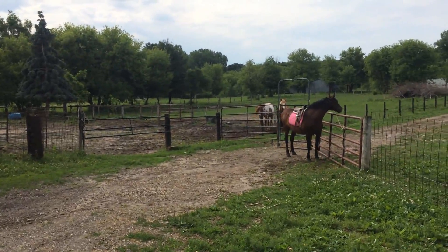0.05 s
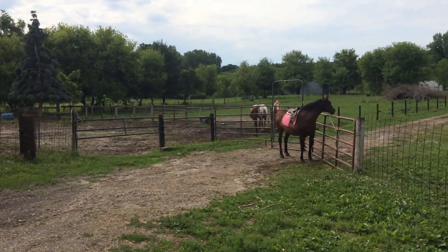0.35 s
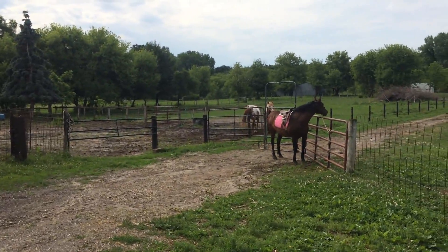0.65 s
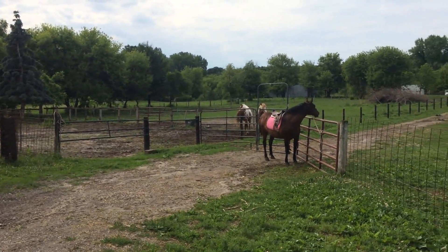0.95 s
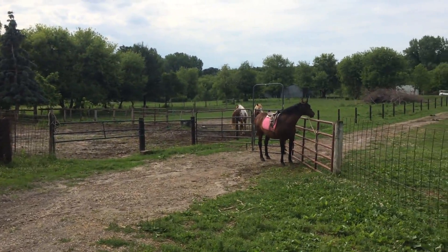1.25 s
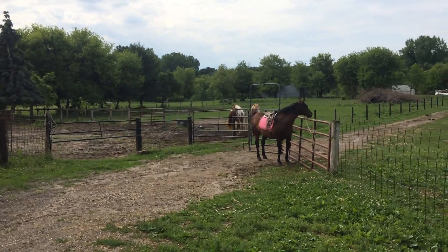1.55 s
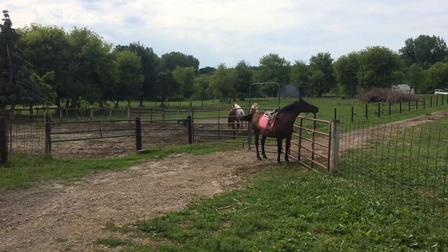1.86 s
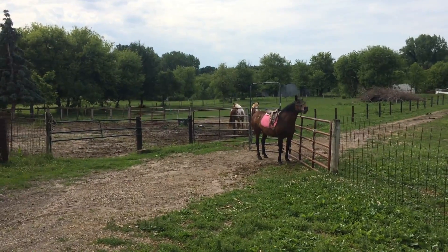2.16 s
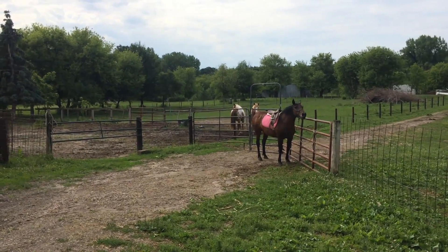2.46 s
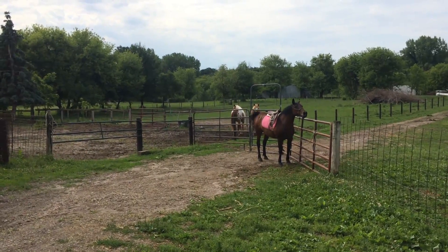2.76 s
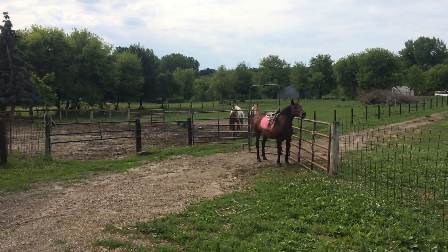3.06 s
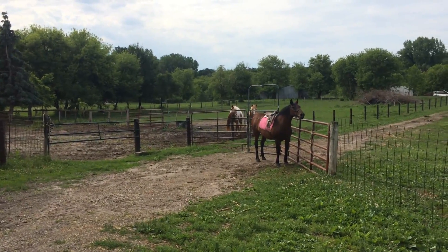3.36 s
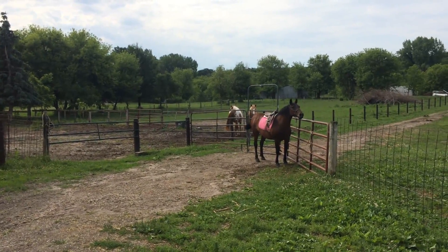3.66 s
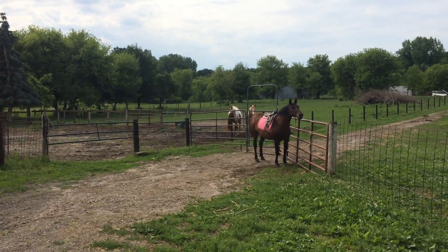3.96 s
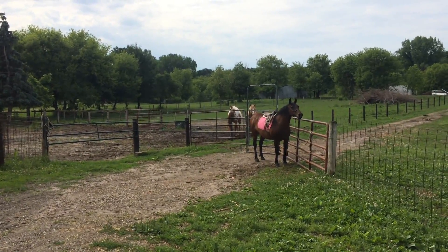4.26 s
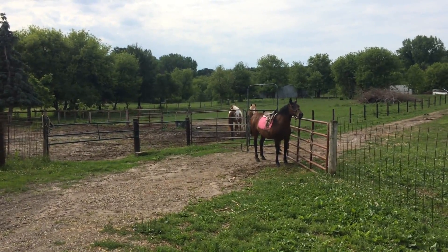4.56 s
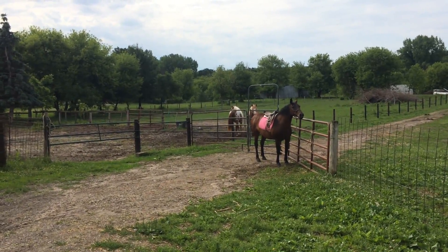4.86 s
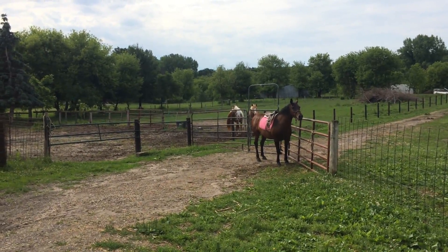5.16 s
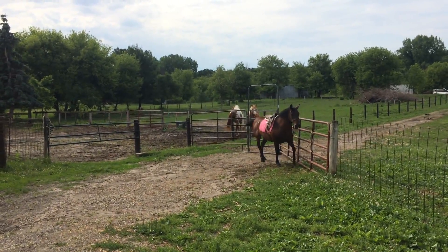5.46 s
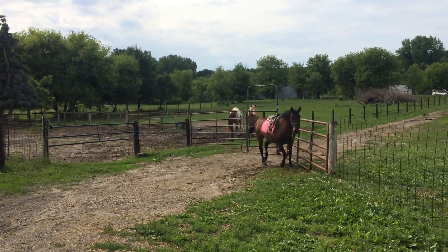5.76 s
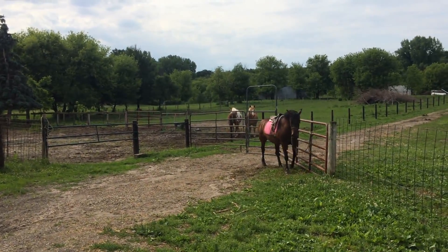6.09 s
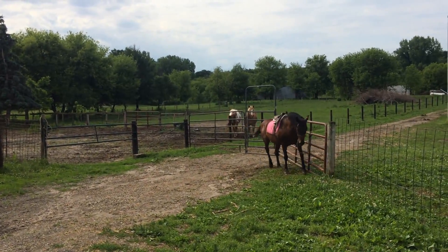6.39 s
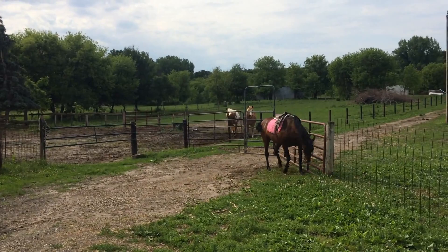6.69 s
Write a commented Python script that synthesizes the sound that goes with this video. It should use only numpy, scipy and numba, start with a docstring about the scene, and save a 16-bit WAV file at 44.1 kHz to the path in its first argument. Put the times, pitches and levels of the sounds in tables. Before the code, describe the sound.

In an open field, a horse lets out one loud whinny, starting as a thin high squeal over a wobbling lower voice, then turning hoarse and pulsing before a short flapping snort. Near the end come a few quiet hoof swishes in grass and one sharp little clink of tack. Faint bird chirps and the low rumble of a far engine continue throughout, and the call echoes slightly off the trees.

```python
"""A distant engine rumbles throughout. Hooves swish in the grass and small birds chirp in the trees.
Near 2 s a horse at a paddock gate whinnies with two voices at once, both from its vocal folds:
a high squeal and a wobbling low voice. They break into rough, falling throbs and end in nostril flaps.
From about 5.7 s the horse steps over the grass, and its tack (the gear it wears) clinks once."""
import sys
import numpy as np
from scipy import signal
from scipy.fft import rfft, irfft
from scipy.io import wavfile
from scipy.ndimage import uniform_filter1d
from numba import njit

SR = 44100
rng = np.random.default_rng(int(sys.argv[2]) if len(sys.argv) > 2 else 0)


def bounce(signal):
    """Save signal as a 16-bit WAV file at the path given by the first command-line argument."""
    frames = np.transpose(np.atleast_2d(signal))
    limited = np.clip(frames, -1, 1)
    pcm = np.round(limited * 32767).astype(np.int16)
    wavfile.write(sys.argv[1], SR, pcm)


N = 301203
T = np.arange(N) / SR
CALL_START_S, CALL_END_S, BREAK_TAKES_S = 1.885, 3.15, .03

# Levels in all tables are relative: the functions turn them up or down.
# where the throat and muzzle ring: f/Hz, width/Hz, level/dB
MOUTH_RINGS = [(538, 133, 1.5), (754.6, 91, 9.5), (1447, 350, 3.5), (1570, 67, -4.5), (2093, 140, 3),
               (2260, 69, 1.5)]
# where the throat's bright edge rings: f/Hz, width/Hz, level/dB
EDGE_RINGS = [(2910, 150, -3), (3278, 297, 1), (3543, 210, -6), (3985, 254, -7.5)]
# where the rushing breath hisses: f/Hz, width/Hz, level/dB
HISS_RINGS = [(4950, 2170, 6), (6220, 1400, 2.5), (7550, 840, 6.5), (10710, 2513, -2.5),
              (13000, 5600, -10.5)]


def amp(db):
    """Turn decibels into a number to multiply by."""
    return 10 ** (np.asarray(db) / 20)


def unit(x):
    """Scale x to an average strength (rms) of 1."""
    return x / np.sqrt(np.mean(x ** 2))


def noise():
    """An even hiss: white noise."""
    return rng.standard_normal(N)


def wander(hz):
    """A smooth random wiggle of size about 1 that changes up to hz times a second."""
    return unit(irfft(rfft(noise()) / (1 + (np.fft.rfftfreq(N, 1 / SR) / hz) ** 4), N))


def curves(table):
    """Join a table's rows by straight lines in time, one curve for each column after the first."""
    s, *columns = np.transpose(table)
    return [np.interp(T, s, c) for c in columns]


def bump(s, half_length):
    """A bell-shaped swell around time s."""
    return np.exp(-np.minimum(((T - s) / half_length) ** 2, 30))


def ramp(start, length):
    """A straight rise from 0 to 1."""
    return np.clip((T - start) / length, 0, 1)


def sounding(start, end):
    """1 between two times and 0 outside, with soft ends."""
    return uniform_filter1d(1. * ((T > start) & (T < end)), size=300)


def turn(hz):
    """How far a wave of changing pitch has turned: its phase in radians."""
    return 2 * np.pi * np.cumsum(hz) / SR


def colour(x, points):
    """Shape the lows and highs of x by rows of f/Hz, level/dB; the result has strength 1."""
    hz, db = np.transpose(points)
    curve_db = np.interp(np.log(np.fft.rfftfreq(N, 1 / SR) + 1), np.log(hz), db)
    return unit(irfft(rfft(x) * amp(curve_db), N))


def resonance(x, hz, width):
    """Keep the part of x near hz, filtering twice for steep sides."""
    b, a = signal.iirpeak(hz, hz / width, fs=SR)
    return signal.lfilter(b, a, signal.lfilter(b, a, x))


def echo(x, fade_s, build_s):
    """A blurred echo from trees and fences that drops 60 dB in fade_s."""
    t = T[:SR]
    tail = rng.standard_normal(SR) * amp(-60 * t / fade_s) * (1 - np.exp(-t / build_s))
    return signal.fftconvolve(x, tail / np.linalg.norm(tail))[:N]


def outdoor_air(level_db=-40):
    """A restless far rumble with a faint hiss of leaves."""
    # lows and highs of the rumble and leaves: f/Hz, level/dB
    air_colour = [(13, -56), (22, -31.5), (49, -6.5), (104, 1.5), (257, -16.5), (420, -18), (668, -27),
                  (1010, -28.5), (1090, -27), (1250, -31.5), (2220, -42), (3250, -44.5), (5030, -48.5),
                  (12700, -59), (15000, -59.5)]
    return colour(noise(), air_colour) * amp(level_db + wander(7.4))


def engine(boom_hz=64, drone_hz=105.7, whine_hz=1090):
    """A far engine: a noisy boom, a wavering drone and a thin whine."""
    # slow swell of the drone: t/s, level/dB
    drone_levels = [(0.0, -53), (0.48, -43.5), (2.68, -56), (3.14, -44.5), (4.22, -45), (4.37, -54),
                    (4.75, -46), (6.83, -42.5)]
    # swells of the whine: t/s, half length/s, level/dB
    whine_swells = [(4.44, 0.16, -53), (5.35, 0.41, -67), (6.202, 0.13, -56.5)]
    boom = amp(-48) * unit(resonance(noise(), boom_hz, width=30))
    drone_db = curves(drone_levels)[0] - 4 + 1.5 * wander(2.6)
    drone = amp(drone_db) * np.sin(turn(drone_hz * (1 + .035 * wander(8.5))))
    swell = amp(-68) + sum(amp(db) * bump(s, half) for s, half, db in whine_swells)
    whine = swell * amp(3.32 * wander(15.3)) * np.sin(turn(whine_hz * (1 + .013 * wander(51.2))))
    return boom + drone + whine


def crackle(hits, fade_s, rise_s=.001, grain_db=3):
    """A burst of bright, grainy noise for each hit (t/s, level/dB), dropping 60 dB in fade_s."""
    # lows and highs of the crackle: f/Hz, level/dB
    crackle_colour = [(1000, -11), (2900, -8), (3700, -8), (5000, 1.5), (7600, 2.5), (10000, -3.5),
                      (15000, -5.5)]
    loudness = 0
    for s, db in hits:
        age = np.maximum(T - s, 0)
        loudness += (1 - np.exp(-age / rise_s)) * amp(db - np.minimum(60 * age / fade_s, 100))
    return loudness * colour(noise() * amp(grain_db * wander(510)), crackle_colour)


def hooves():
    """Hooves brush through the grass in soft swishes."""
    # the swishes: t/s, level/dB
    swishes = [(.005, -58), (.075, -64.5), (5.675, -57), (5.782, -64), (6.0, -65), (6.328, -59.5),
               (6.458, -62.5), (6.63, -58.5)]
    return crackle(swishes, fade_s=.35)


def bird_chatter(flicker_db, spread_hz=2000 / 3):
    """Bursts of twitter in which the pitch darts about at random."""
    # the bursts: peak t/s, half length/s, middle f/Hz, level/dB
    bursts = [(.02, 0.031, 4100, -51), (.092, 0.025, 4450, -50), (.826, .11, 5160, -61.5),
              (1.336, 0.12, 4680, -58), (1.525, .092, 4080, -61), (3.19, 0.052, 3900, -52.5),
              (4.027, .11, 4920, -60.5), (5.771, .05, 4200, -57.5), (6.48, .14, 4850, -62.5)]
    dart, out = np.clip(wander(168.8), -2, 2), np.zeros(N)
    for s, half, hz, db in bursts:
        span = abs(T - s) < 3 * half
        loudness = amp(db - .5 + flicker_db[span]) * bump(s, half)[span]
        out[span] += loudness * np.sqrt(2) * np.sin(turn(hz + spread_hz * dart[span]))
    return out


def bird_notes(faint_count=12, chirp_fall=.22, whistle_hz=2880):
    """List the birds' notes: t/s, length/s, start f/Hz, end f/Hz, arch/Hz, level/dB."""
    # nearer chirps (arch lifts the pitch mid-note): t/s, length/s, f/Hz, arch/Hz, level/dB
    near_chirps = [(0.284, .11, 3540, 0, -57), (0.406, .063, 2400, 0, -60.5),
                   (0.468, .038, 4030, 1404, -55), (0.5, 0.047, 3700, 650, -52.5),
                   (0.502, .13, 1440, 0, -57), (1.392, 0.09, 3860, -300, -57),
                   (3.424, 0.078, 4110, 902.5, -59), (3.719, 0.056, 3920, 0, -55),
                   (4.318, 0.065, 4370, 400, -59.5), (4.406, 0.066, 4280, 3, -54.5),
                   (4.463, 0.094, 3554, -200, -53.5), (3.81, .05, 3090, 0, -63.5),
                   (4.636, .2, 4400, -200, -65), (4.83, .08, 4200, -400, -61), (5.235, .048, 4200, 0, -61),
                   (5.291, .055, 3340, 200, -61), (5.672, 0.11, 3710, -300, -60),
                   (6.638, 0.1, 3950, 0, -60)]
    # soft arched whistles: t/s, length/s, level/dB
    whistles = [(0.929, .22, -61.5), (5.06, 0.32, -68.5)]
    # quick upward flicks: t/s
    flicks = [1.387, 1.48, 6.462, 6.553]
    faint_chirps = [(when * T[-1], .08, 4200 + 660 * (2 * height - 1), 0, -69)
                    for when, height in rng.random((faint_count, 2))]
    notes = [(s, length, hz * (1 + chirp_fall / 2), hz * (1 - chirp_fall / 2), arch_hz, db)
             for s, length, hz, arch_hz, db in near_chirps + faint_chirps]
    notes += [(s, length, whistle_hz, whistle_hz, 314, db) for s, length, db in whistles]
    return notes + [(s, .026, 6100, 8260, 0, -62.5) for s in flicks]


def bird_song(flicker_db, warble):
    """Each note is one sliding tone; very short and long notes are nearly pure, the others warble."""
    out = np.zeros(N)
    for s, length, start_hz, end_hz, arch_hz, db in bird_notes():
        span = (T >= s) & (T < s + length)
        progress = (T[span] - s) / length
        buzz = 1 if .045 < length < .15 else .1
        hz = start_hz + (end_hz - start_hz) * progress + 4 * arch_hz * progress * (1 - progress)
        tone = np.sin(turn(hz * (1 + buzz * warble[span])))
        swell = np.sqrt(2 * np.sin(np.pi * progress).clip(0))
        out[span] += amp(db - 1 + buzz * flicker_db[span]) * swell * tone
    return out


def birds():
    """Song and chatter, blurred by the trees, over a faint far chorus."""
    warble, flicker_db = .045 * wander(138), 3 * np.clip(wander(43), -2, 1)
    song, chatter = bird_song(flicker_db, warble), bird_chatter(flicker_db)
    chorus = unit(resonance(noise(), hz=3830, width=2790)) * amp(-67 + 2 * wander(6.5))
    return song + .9 * chatter + .6 * echo(song + chatter, fade_s=.36, build_s=.005) + chorus


def roughness(push, break_s, tiring_per_s, calm=.07, tiring_s=2.56):
    """From 0 to 1: the vocal folds settle, tear at each push once the voice breaks, then tire."""
    settling = .3 * (1 - ramp(CALL_START_S, .15))
    tearing = ramp(break_s, BREAK_TAKES_S) * push
    tiring = tiring_per_s * np.maximum(T - tiring_s, 0)
    return np.clip(calm + settling + tearing + tiring, 0, 1)


def squeal_shape(sag=.32, arch_s=.05, rise_db_per_s=300, fall_db_per_s=140, yelp_overtones_db=-38):
    """Pitch, level and overtone level of the high voice: a held squeal, then arched yelps."""
    # the held squeal: t/s, f/Hz, level/dB, overtone level/dB
    held_squeal = [(1.885, 1150, -51.5, -68), (1.897, 1311, -39, -66), (1.925, 1640, -37.5, -52),
                   (1.96, 1953, -55, -48.5), (2.004, 2080, -27.5, -42.5), (2.06, 2117, -26, -36.5),
                   (2.145, 2124, -14.5, -31.5), (2.21, 2130, -11, -34), (2.32, 2137, -13, -35),
                   (2.378, 2188, -14.5, -24.5), (2.408, 2111, -19, -32.5), (2.448, 2185, -18, -33.5),
                   (2.484, 2239, -11, -23), (2.512, 2020, -21, -29), (2.538, 1650, -29.5, -44)]
    # the yelps it breaks into: t/s, top f/Hz, level/dB
    yelps = [(2.589, 2105, -16), (2.728, 1760, -24), (2.872, 1460, -25.5)]
    s, top_hz, top_db = np.transpose(yelps)[:, :, None]
    levels = top_db - np.maximum(rise_db_per_s * (s - T), fall_db_per_s * (T - s))
    pitches = top_hz * (1 - sag * (1 - bump(s, arch_s)))
    loudest_yelp = np.choose(levels.argmax(axis=0), pitches), levels.max(axis=0), yelp_overtones_db
    holding = T < held_squeal[-1][0]
    return [uniform_filter1d(np.where(holding, held, yelp), size=400)
            for held, yelp in zip(curves(held_squeal), loudest_yelp)]


def high_voice(low_phase, rough, end_s=2.907, jitter=.032, dulling_db=28):
    """A nearly pure squeal, shaken by the low voice and torn as it gets rough."""
    # how the throat colours the overtones (tones at multiples of the pitch): f/Hz, level/dB
    throat_colour = [(2450, -36), (2820, -4), (3300, 1), (4000, 5), (4300, -9), (4650, -18.5), (5100, -3),
                     (5800, -7.5), (6450, 1), (7200, -16), (8500, -16.5), (10700, -19.5), (12900, -17.5),
                     (15000, -45)]
    hz, db, overtones_db = squeal_shape()
    on = sounding(CALL_START_S, end_s)
    phase = turn(hz * (1 + jitter * rough ** 1.5 * wander(282) + .002 * wander(60)))
    tremble = 1 + .5 * rough ** 1.2 * np.clip(wander(140), -2, 2)
    grip = amp(7.5 * np.clip(wander(30), -2, 1))  # the two voices pull on each other unevenly
    tone = amp(db) * np.sqrt(2) * np.sin(phase) * (1 + .007 * grip * np.cos(low_phase))
    shake = .24 * grip * np.sin(low_phase + wander(70)) + .1 * wander(700)
    # rough folds lose their upper overtones
    stack = sum(amp(-dulling_db * rough * (k > 2)) * np.sin(k * phase + shake * k / 2)
                for k in range(1, 8))
    overtones = colour(stack * on, throat_colour) * np.sqrt(np.mean(on))
    overtones *= amp(overtones_db + .5 + 1.93 * wander(38))
    return (tone + overtones) * tremble * on


def ring(x, rings):
    """The call rings at some pitches and dips at others."""
    # narrow bands missing from the call, which make it sound hollow: f/Hz, width/Hz
    hollow_bands = [(1005, 540), (1860, 90), (2540, 400), (4620, 300)]
    out = sum(amp(db) * resonance(x, hz, width) for hz, width, db in rings)
    for hz, width in hollow_bands:
        out = signal.lfilter(*signal.iirnotch(hz, hz / width, fs=SR), out)
    return unit(out)


def low_voice(phase, rough, effort, edge, hiss, flutter_hz=170):
    """The vocal folds buzz in the breath; rough folds lose their pitch and chop it into uneven puffs."""
    buzz = unit(sum(np.cos(k * phase) / k ** .5 for k in range(1, 13)))
    puffs = amp(rough * np.clip(wander(flutter_hz), -2, 2))
    air = unit(noise() * (1 + .8 * np.cos(phase)))
    source = puffs * ((1 - .45 * rough) * buzz + (.3 + .7 * rough) * air)
    # a gentle voice is dull: the upper rings need the folds to snap shut
    brightness = (effort / amp(-37.5)) ** .27
    mouth = .67 * ring(source, MOUTH_RINGS[:2]) + brightness * ring(source, MOUTH_RINGS[2:])
    steady_breath = ramp(CALL_START_S, .22) * (1 - ramp(CALL_END_S - .081, .081))
    voice = amp(6.5) * effort * mouth
    voice += (edge + amp(-52) * steady_breath) * ring(source, EDGE_RINGS)
    voice += (hiss + amp(-50) * steady_breath) * ring(air * puffs + .46 * source, HISS_RINGS)
    return voice * sounding(CALL_START_S, CALL_END_S)


def whinny(low_break_s=2.455, high_break_s=2.489, droop=.08, waver=.012, jitter=.08):
    """Throbs of breath drive the low voice, and the high voice sounds on top."""
    # the throbs: t/s, half length/s, f/Hz, level/dB, throat edge level/dB, hiss level/dB
    throbs = [(1.918, 0.023, 700, -56.5, -52.5, -67.5), (2.022, 0.028, 711, -53, -49.5, -55),
              (2.116, 0.03, 774, -57, -52, -43), (2.202, 0.031, 735, -57.5, -44.5, -57),
              (2.291, .03, 735, -56, -43, -64), (2.39, .036, 644.8, -39, -32, -48),
              (2.512, .035, 605, -31, -21, -34), (2.634, 0.049, 605.2, -31, -23.5, -33.5),
              (2.75, 0.034, 584.6, -29, -26.5, -33), (2.872, 0.035, 600.5, -29.5, -32.5, -39.5),
              (3.015, 0.044, 565.4, -36.5, -65, -51.5)]
    times, halves, pitches, levels_db, edges_db, hisses_db = np.transpose(throbs)
    swells = np.array([bump(s, half) for s, half in zip(times, halves)])
    push = swells.sum(axis=0)
    # until the voice breaks, its pitch droops between throbs
    unbroken = 1 - ramp(low_break_s, BREAK_TAKES_S)
    hz = np.interp(T, times, pitches) * (1 - droop * (1 - push) * unbroken)
    rough = roughness(push, low_break_s, tiring_per_s=3.2)
    phase = turn(hz * (1 + (waver + jitter * rough) * wander(163)))
    low = low_voice(phase, rough, effort=amp(levels_db) @ swells,
                    edge=amp(edges_db - 2) @ swells, hiss=amp(hisses_db) @ swells)
    return low + high_voice(phase, roughness(push, high_break_s, tiring_per_s=1))


def nostrils():
    """Each flap lets out a thud, a snort and a spray of air; bright flaps have less thud, more spray."""
    # nostril flaps: t/s, half length/s, level/dB, brightness/dB
    flaps = [(2.658, .018, -43, -6), (2.785, .017, -40.5, -11), (2.822, 0.0033, -29.5, -4),
             (2.897, .018, -33.5, 5), (2.947, .006, -39, 3), (2.967, 0.0081, -36, -4),
             (2.993, 0.0028, -23.5, -2), (3.001, 0.0065, -30.5, -2), (3.025, 0.0053, -28.5, -1),
             (3.072, 0.0042, -34.5, 8), (3.091, .003, -29, 8), (3.109, 0.0064, -35.5, 3.5),
             (3.129, .011, -45.5, -2)]
    thud = amp(-3) * unit(resonance(noise(), hz=180, width=100))
    snort = ring(noise(), MOUTH_RINGS)
    spray = amp(-10) * unit(ring(noise(), HISS_RINGS) + .67 * ring(noise(), EDGE_RINGS))
    return sum(amp(db) * bump(s, half) * (amp(-bright_db) * thud + snort + amp(bright_db) * spray)
               for s, half, db, bright_db in flaps)


def tack_clink(at_s=6.006, level_db=-30):
    """The horse's gear gives one sharp clink."""
    return crackle([(at_s, level_db)], fade_s=.016)


def scene(horse_db=3, echo_db=-27):
    """The horse in the open, with a faint echo from the tree line; one channel."""
    call = amp(horse_db) * (whinny() + nostrils())
    tree_echo = amp(echo_db) * echo(call, fade_s=1, build_s=.043)
    return (call + tree_echo + birds() + hooves() + outdoor_air() + engine() + tack_clink())[None]


@njit
def follow(x, attack, release):
    """Track how loud x is, rising at the attack rate and falling at the release rate."""
    out, level = np.empty(len(x)), 0.
    for i in range(len(x)):
        level += (abs(x[i]) - level) * (attack if abs(x[i]) > level else release)
        out[i] = level
    return out


def record(dry, loud_db=-27, squeeze=.25, attack_s=.004, release_s=.2027, top_hz=15400):
    """Turn everything down while the call is loud, and cut the highest treble."""
    loudness = follow(dry[0], 1 / (attack_s * SR), 1 / (release_s * SR))
    gain = np.maximum(loudness / amp(loud_db), 1) ** -squeeze
    return signal.sosfilt(signal.ellip(10, .2, 80, top_hz, fs=SR, output="sos"), dry * gain)


dry = scene()
out = record(dry)
bounce(out)
```